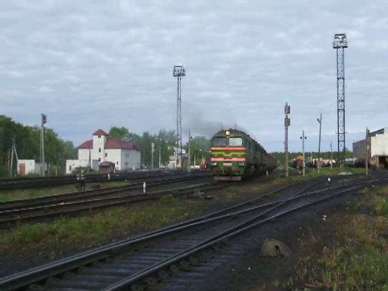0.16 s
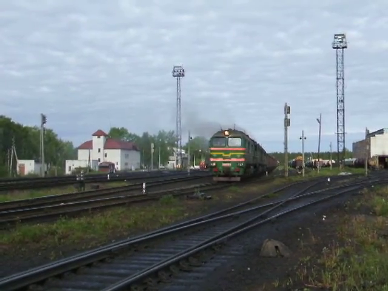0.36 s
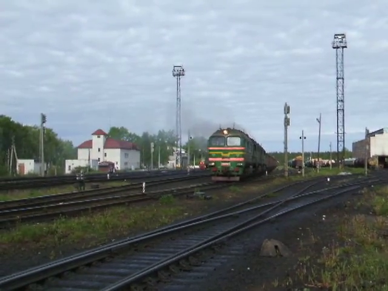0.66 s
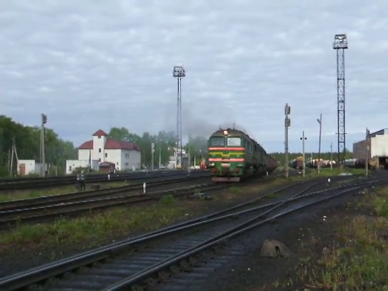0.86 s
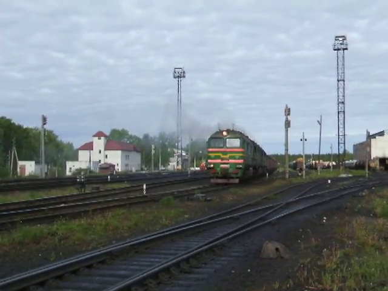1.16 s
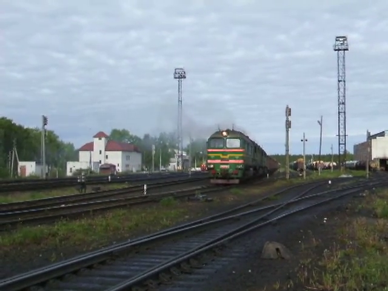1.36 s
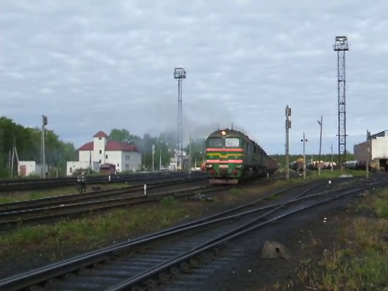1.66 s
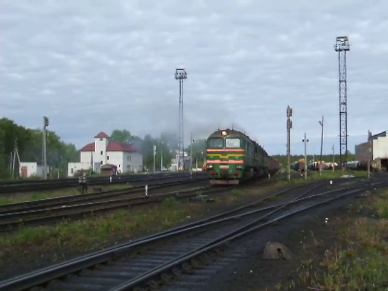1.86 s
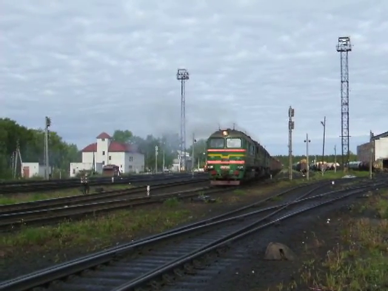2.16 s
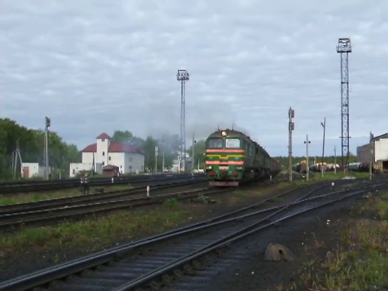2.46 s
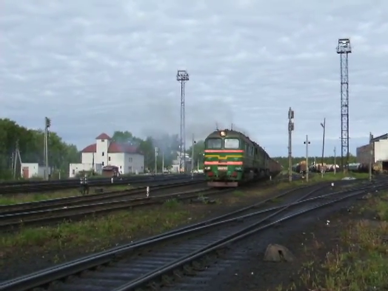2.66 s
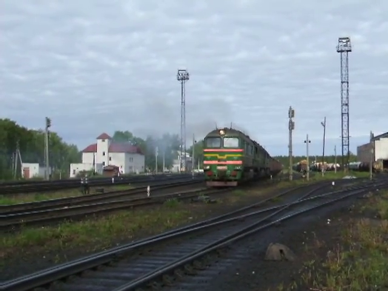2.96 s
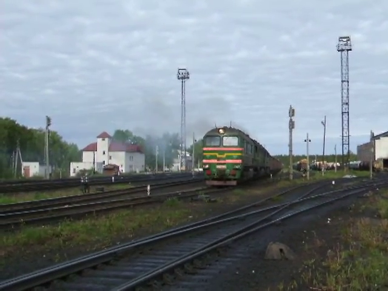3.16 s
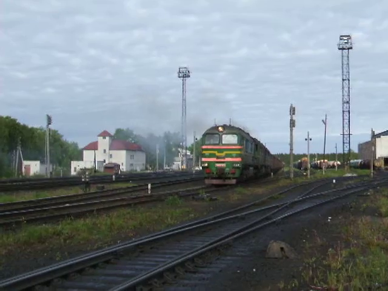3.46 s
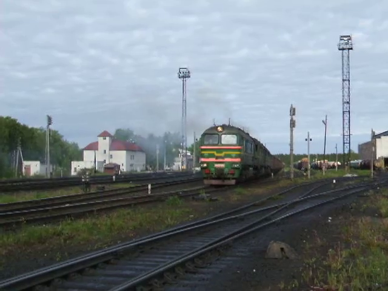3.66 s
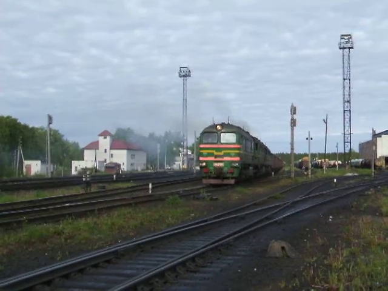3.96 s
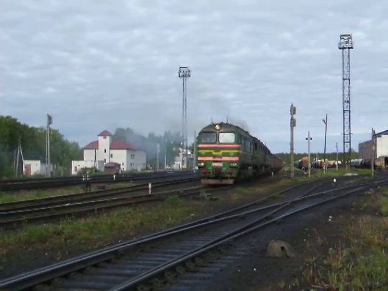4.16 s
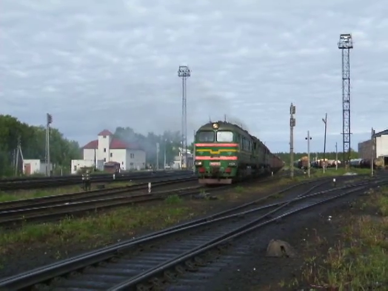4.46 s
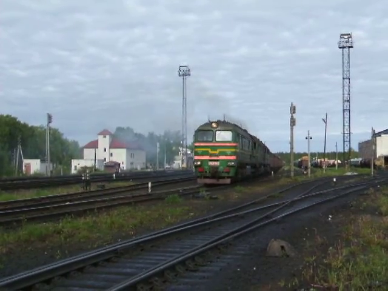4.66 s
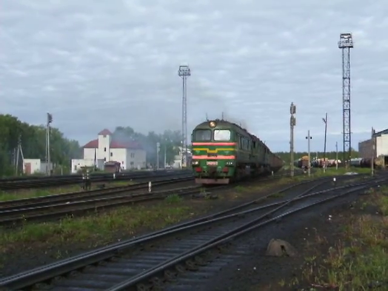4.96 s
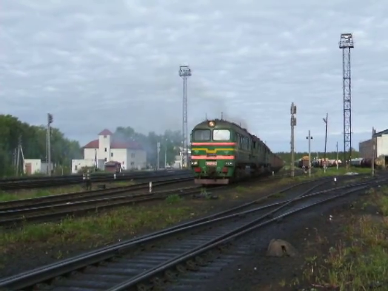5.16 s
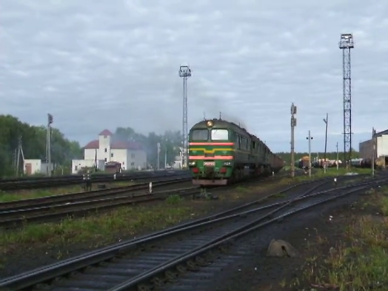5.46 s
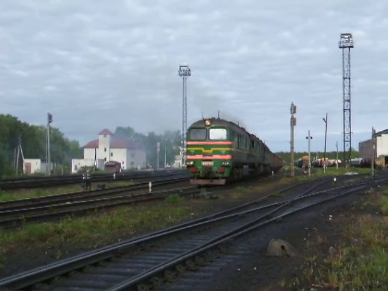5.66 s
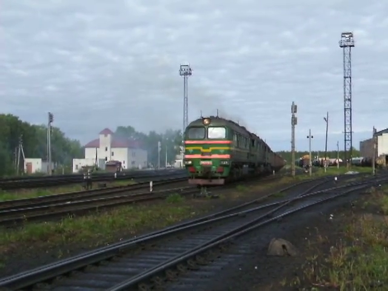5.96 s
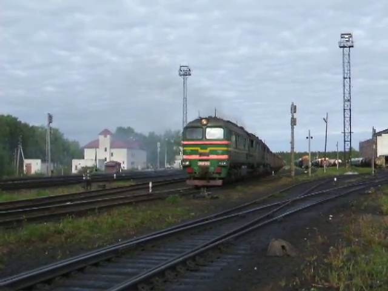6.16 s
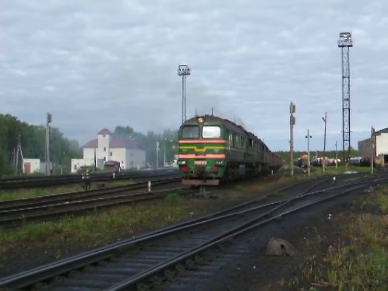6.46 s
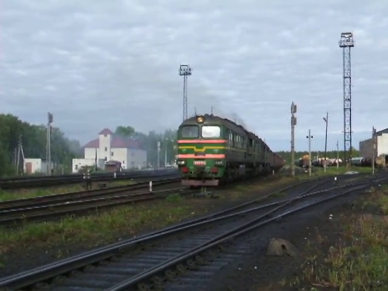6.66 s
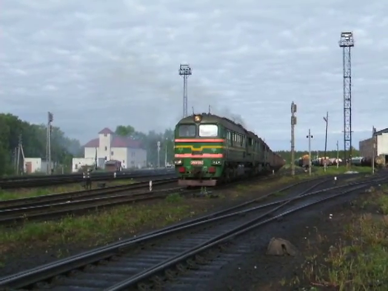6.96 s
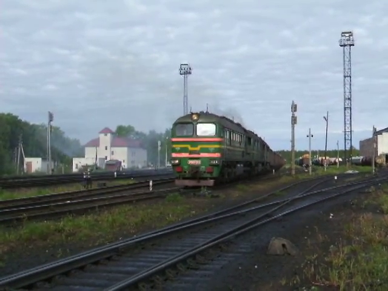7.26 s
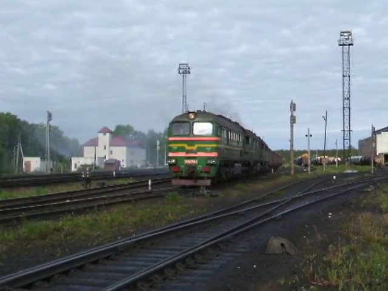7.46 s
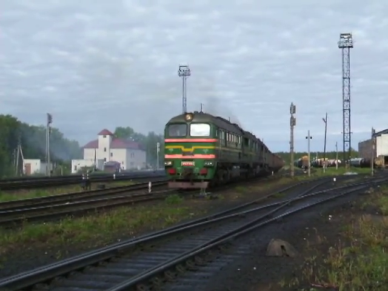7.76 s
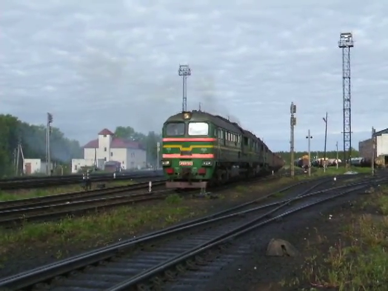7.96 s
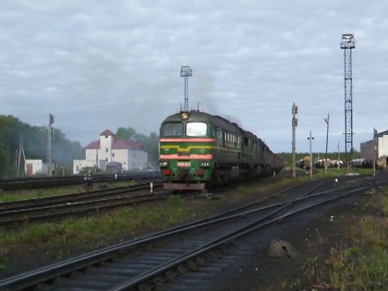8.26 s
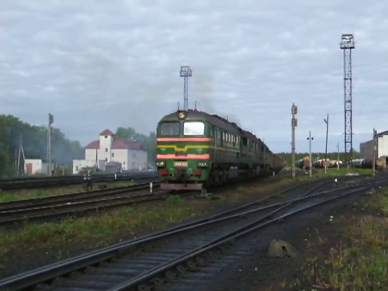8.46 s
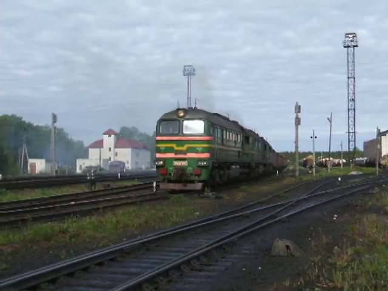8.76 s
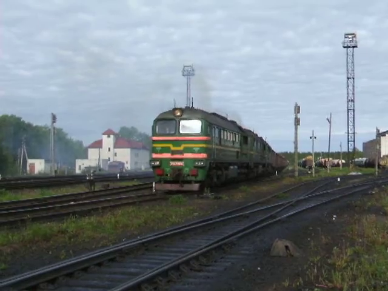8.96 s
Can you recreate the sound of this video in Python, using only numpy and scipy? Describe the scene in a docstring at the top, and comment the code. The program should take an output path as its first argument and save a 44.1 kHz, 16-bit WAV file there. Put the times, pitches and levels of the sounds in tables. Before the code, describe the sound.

Outdoors in a station yard, a slow freight locomotive gives a deep, unevenly pulsing diesel drone with steady roar and hiss throughout. The small hand-held microphone picks up a few handling ticks, then a short run of wind buffets along with a thin wheel squeal. After that, sharp plastic clicks sound up close and a distant bird chirps faintly. The engine grows slightly fuller toward the end.

```python
"""A station yard: a two-unit diesel locomotive creeps closer with a freight train.
Both engines hunt around 410 rpm; their exhaust tones beat under stack roar, machinery hiss and whines.
A wheel rings, a flange squeals once, a small bird chirps far off.
Wind buffets a small hand-held camera, whose plastic case ticks and rustles under the fingers."""
import sys
import numpy as np
from scipy import signal
from scipy.fft import rfft, irfft
from scipy.io import wavfile

SR = 44100
rng = np.random.default_rng(int(sys.argv[2]) if len(sys.argv) > 2 else 0)


def put_to_file(sound):
    """Save the sound as 16-bit audio at rate SR, in the file named by the first command-line argument."""
    columns = np.atleast_2d(sound).T  # one column per channel
    safe = np.clip(columns, -1, 1)
    whole_steps = np.round(safe * 32767)
    wavfile.write(sys.argv[1], SR, whole_steps.astype(np.int16))


N = 402191
T = np.arange(N) / SR
SHAFT_HZ = 6.803  # mean crankshaft speed

# beat minima of a six-cylinder bank's firing note: time_s, cancelled_share
FIRING_BEATS = [(-.3, 0.5), (.39, 0.6), (.68, .8), (1.43, 0.6), (1.8, .85), (2.41, .8), (2.98, 0.9),
                (3.55, 1), (3.92, .35), (4.84, .8), (5.82, 0.2), (6.8, .55), (7.58, 0.6), (8.52, .45),
                (9.3, .3)]
# firing note strength: time_s, gain_db
FIRING_GAIN = [(0, -32), (.5, -40), (1.05, -27), (1.65, -38), (2.1, -28), (2.7, -35), (3.3, -28.5),
               (4.15, -27), (4.85, -31.5), (5.5, -23), (7.8, -28), (9.12, -23)]
# beat minima of the deep drone: time_s, cancelled_share
DEEP_BEATS = [(-.15, 0.07), (.91, 0.2), (1.5, 0.4), (1.79, 0.55), (2.15, .3), (2.57, 0.7), (2.84, 0.6),
              (3.1, 0.3), (3.55, 0.66), (3.92, 0.3), (4.44, 0.1), (4.88, 1), (5.78, 0.5), (6.11, 0.54),
              (6.6, 0.37), (7.08, 0.6), (7.44, 0.7), (8.78, .75), (9.2, 0)]
# deep drone strength: time_s, gain_db
DEEP_GAIN = [(0, -22), (1.2, -21.5), (1.6, -28.5), (2, -20), (2.95, -29), (3.4, -21.5), (5.3, -23.5),
             (6.2, -25), (8.2, -23), (9.12, -25)]
# weaker engine tones (exhaust harmonics; gear or blower hum at 26 per turn): cycles_per_turn, gain_db
ENGINE_ORDERS = [(3, -38), (4, -37), (7, -33.5), (8, -35), (10, -32.5), (11, -39.5), (12, -39.5), (13, -40),
                 (14, -40.5), (15, -32), (16, -41.5), (17, -44), (18, -43.5), (21, -52), (22, -53.5),
                 (26, -40), (32, -55), (39, -49)]
# fullness of the low exhaust tones: time_s, relative_db
EXHAUST_SWELL = [(0, -32), (.68, -33.5), (.9, -25), (1.38, -37.5), (1.7, -30.5), (2.5, -31.5), (2.75, -30),
                 (3.9, -29), (4.3, -27), (4.55, -32.5), (6.2, -29.5), (8.75, -27.5), (8.92, -39),
                 (9.12, -26.5)]
# broad train noise: time_s, roar_gain_db, hiss_gain_db
NOISE_GAIN = [(0, -38.5, -43), (.9, -37.5, -42), (1.6, -38.5, -40), (2.15, -37, -41), (2.9, -39.5, -42.5),
              (3.33, -35.5, -39.5), (3.9, -40.5, -45.5), (4.6, -38, -42), (5.5, -38.5, -41),
              (6.1, -37, -41), (7.1, -36.3, -40), (7.45, -38.5, -41), (8.05, -35.5, -39.5),
              (8.6, -38.5, -42.5), (8.85, -37.5, -42.5), (9.12, -35, -39)]
# exhaust roar spectrum: freq_hz, gain_db
ROAR_SPECTRUM = [(20, -1.5), (48, 0.5), (75, 15), (140, 5.5), (200, 1.5), (270, 2), (310, 0.5), (380, 3),
                 (485, -11.5), (580, -1), (690, 1), (770, 1.5), (860, -10.5), (1500, -13.5)]
# machinery and wheel hiss spectrum: freq_hz, gain_db
HISS_SPECTRUM = [(300, -6), (850, 4), (1030, -0.5), (1160, 4.5), (1260, 1.5), (1370, 4), (1850, -3.5),
                 (2200, -2), (3400, -5.5), (4100, -8), (5200, -12.5), (6200, -11.5), (7600, -14),
                 (8900, -31.5)]
# brief dips in the hiss: centre_s, depth_db, width_s
HISS_DIPS = [(8.473, 3.5, .04), (8.68, 2.5, .06)]
# swells of a ringing wheel mode: centre_s, level_db, width_s
WHEEL_RINGS = [(2.15, -53.5, .5), (4.2, -58.5, 1.3), (6.0, -52, 0.58), (8.1, -52, 0.54)]
# gusts on the microphone: centre_s, level_db, width_s
WIND_GUSTS = [(3.236, -25.5, 0.033), (3.523, -19.5, .012), (3.541, -16.5, 0.014), (3.623, -16, 0.021),
              (3.652, -24, 0.02), (3.755, -24, 0.045), (3.825, -20, 0.033), (3.871, -16, 0.016),
              (4.172, -22.5, 0.028), (4.41, -30, 0.036), (4.65, -25.5, 0.024)]
# wind buffet spectrum: freq_hz, gain_db
WIND_SPECTRUM = [(20, -10), (70, 3.5), (170, 3.5), (300, -6.5), (500, -14.5), (900, -36), (3000, -57)]
# plastic case resonances: freq_hz, bandwidth_hz, gain_db
CASE_MODES = [(1300, 890, 11), (2230, 1400, 4), (3440, 280, 10.5), (5520, 490, -2.5), (6400, 450, 4.5),
              (7260, 500, -27)]
# slips on the case: start_s, peak_db, brightness_hz, bandwidth_hz, contact_s
CASE_SLIPS = [(1.259, -18.5, 6550, 2000, 0.005), (1.316, -22.5, 6550, 4000, .004),
              (1.3655, -22.5, 5200, 7000, .0024), (1.445, -18, 6440, 2500, 0.0032),
              (1.502, -22, 6500, 4000, .003), (1.552, -22, 4000, 6000, .002),
              (1.624, -21.5, 6000, 4000, .0034), (6.268, -21, 3740, 1800, 0.0029),
              (6.271, -15.5, 2200, 3180, 0.0016), (6.6685, -15, 3600, 12000, 0.0082),
              (6.67, -17, 7440, 1800, .003), (6.6917, -12.5, 6300, 5000, 0.002),
              (6.6972, -19, 6800, 6000, .003), (6.7054, -12.5, 1260, 1400, 0.00071),
              (6.7061, -13, 2580, 4500, 0.0007), (6.7086, -21, 4500, 14000, 0.0082),
              (6.847, -24, 6650, 5000, .0016), (7.3275, -24, 6000, 6000, .002),
              (7.3555, -24, 7000, 4000, .003), (8.079, -30, 7000, 5000, 0.0022),
              (8.522, -28.5, 7200, 6000, .0036)]
# fingers sliding on the case: centre_s, level_db, width_s
FINGER_RUBS = [(1.38, -42, .11), (1.55, -43, 0.14), (6.115, -44, .07), (6.72, -37.5, .055),
               (7.362, -34.5, .04), (8.05, -48.5, 0.18), (8.92, -50, 0.27)]
# finger rustle spectrum: freq_hz, gain_db
RUB_SPECTRUM = [(1000, -16), (4000, -9), (5500, -2.5), (6700, 1), (7900, 0), (9000, -23.5)]
# thin camera whines: pitch_hz, level_db
CAMERA_TONES = [(7678, -65), (7707, -72), (8293, -77), (8322, -69.5)]
# distant bird chirps: centre_s, level_db, top_pitch_hz, width_s
BIRD_CHIRPS = [(6.537, -45, 4300, .04), (6.755, -45, 4540, .035), (6.915, -44, 4250, 0.02),
               (6.96, -44, 4470, .03)]


def governor(swing_hz, period_s, peak_s):
    """Shaft speed in Hz: the governor overshoots and undershoots evenly."""
    return SHAFT_HZ + swing_hz * np.cos(2 * np.pi * (T - peak_s) / period_s)


def crank(speed_hz, wobble):
    """Turns made by a slightly uneven crankshaft."""
    return np.cumsum(speed_hz * (1 + wobble * walk(8.9))) / SR


def beating(turns, beats, order):
    """One exhaust tone from both units; the rear slips a cycle between beat minima."""
    minima_s, share = np.transpose(beats)
    slip = np.interp(T, minima_s, np.arange(len(minima_s)))
    phase = order * turns + rng.random()
    rear_share = np.interp(T, minima_s, share)
    return np.sqrt(2) * (np.sin(2 * np.pi * phase) - rear_share * np.sin(2 * np.pi * (phase + slip)))


def drone(turns, firing_db, deep_db):
    """The two strongest exhaust tones, throbbing as the units beat."""
    firing = undb(curve(FIRING_GAIN)[0] + firing_db) * beating(turns, FIRING_BEATS, order=6)
    deep = undb(curve(DEEP_GAIN)[0] + deep_db) * beating(turns, DEEP_BEATS, order=9)
    return firing + deep


def engine_tones(turns, gain_db, waver_db, swell_below_hz=140):
    """Exhaust harmonics of unequal cylinders plus a gear or blower hum; all waver, low ones swell."""
    swell_db, = curve(EXHAUST_SWELL)
    swell_db -= swell_db.mean()
    waver, out = walk(1.2), 0
    for order, db in ENGINE_ORDERS:
        low_share = 1 / (1 + (order * SHAFT_HZ / swell_below_hz) ** 8)
        drift_db = waver_db * np.roll(waver, rng.integers(N))
        out += undb(db + gain_db + low_share * swell_db + drift_db) * tone(turns, order)
    return out


def exhaust_roar(turns, level_db, chuff, lope, flutter_db):
    """Gas leaves the stack in puffs, stronger once a turn, and roars in the silencer."""
    puffs = 1 + chuff * (tone(turns, 12) + tone(turns, 9)) + lope * tone(turns, 1)
    gain = undb(level_db + flutter_db * walk(17))
    return gain * colour(puffs * rng.standard_normal(N), ROAR_SPECTRUM)


def machinery(turns, level_db, clatter, flutter_db):
    """Fans, valve gear and wheels hiss, with light clatter at the firing rate."""
    pulses = 1 + clatter * tone(turns, 12)
    dip_db = sum(db * np.exp(-((T - centre_s) / width_s) ** 2) for centre_s, db, width_s in HISS_DIPS)
    gain = undb(level_db - dip_db + flutter_db * walk(17))
    return gain * colour(pulses * rng.standard_normal(N), HISS_SPECTRUM)


def whine(ramp_hz, ramp_db, spread_hz):
    """Rough drive or blower whine, rising as the train gathers speed."""
    phase = 2 * np.pi * np.cumsum(np.linspace(*ramp_hz, N)) / SR
    narrow_noise = walk(spread_hz) * np.sin(phase) + walk(spread_hz) * np.cos(phase)
    return undb(np.linspace(*ramp_db, N)) * narrow_noise


def wheel_ring(mode_hz, bandwidth_hz):
    """Rolling rings a wheel mode faintly, on and off."""
    f = np.fft.rfftfreq(N, 1 / SR) + 1
    ring = irfft(rfft(rng.standard_normal(N)) * resonance(f, mode_hz, bandwidth_hz) ** 2, N)
    return swells(WHEEL_RINGS) * unit(ring)


def flange_squeal(peak_s, attack_s, release_s, pitch_hz, level_db, waver_db=3.5, waver_hz=14):
    """A flange sings briefly and unevenly on the rail."""
    width_s = np.where(T < peak_s, attack_s, release_s)
    grip = np.exp(-np.minimum(((T - peak_s) / width_s) ** 2, 20))
    return undb(level_db + waver_db * walk(30)) * grip * sine(pitch_hz + waver_hz * walk(40))


def wind():
    """Gusts thump on the microphone."""
    return swells(WIND_GUSTS) * colour(rng.standard_normal(N), WIND_SPECTRUM)


def case_ticks(size=4096):
    """Short slips excite the case; brighter contacts ring higher modes."""
    out, t, f = np.zeros(N + size), np.arange(size) / SR, np.fft.rfftfreq(size, 1 / SR) + 1
    body = sum(undb(db) * resonance(f, hz, bandwidth_hz) for hz, bandwidth_hz, db in CASE_MODES)
    for start_s, peak_db, brightness_hz, bandwidth_hz, contact_s in CASE_SLIPS:
        slip = rng.standard_normal(size) * np.exp(-t / contact_s)
        tick = irfft(rfft(slip) * body * resonance(f, brightness_hz, bandwidth_hz) ** 2)
        start = int(start_s * SR)
        out[start:start + size] += undb(peak_db) * tick / np.abs(tick).max()
    return out[:N]


def finger_rustle(grain_db):
    """Fingers slide on the plastic with grainy friction."""
    friction = rng.standard_normal(N) * undb(grain_db * walk(200))
    return swells(FINGER_RUBS) * colour(friction, RUB_SPECTRUM)


def bird(arch):
    """Each chirp rises to its top pitch and falls again."""
    out = 0
    for centre_s, db, top_hz, width_s in BIRD_CHIRPS:
        pitch_hz = top_hz * (1 - arch * np.minimum(((T - centre_s) / width_s) ** 2, 2))
        out += swells([(centre_s, db, width_s)]) * sine(pitch_hz)
    return out


def camera_whine(jitter_hz):
    """Thin, steady tones from the camera itself."""
    return sum(undb(db) * np.sqrt(2) * sine(hz + jitter_hz * walk(20)) for hz, db in CAMERA_TONES)


def undb(db):
    """Decibels to gain."""
    return 10 ** (np.asarray(db) / 20)


def unit(x):
    """Scale to rms 1."""
    return x / np.sqrt(np.mean(x ** 2))


def curve(table):
    """Each value column of a timed table, per sample."""
    time_s, *columns = np.transpose(table)
    return [np.interp(T, time_s, column) for column in columns]


def walk(cutoff_hz):
    """Smooth random drift, rms 1."""
    f = np.fft.rfftfreq(N, 1 / SR)
    return unit(irfft(rfft(rng.standard_normal(N)) / (1 + (f / cutoff_hz) ** 4), N))


def colour(x, spectrum):
    """Filter by (freq_hz, gain_db) points; rms 1."""
    hz, db = np.transpose(spectrum)
    f = np.fft.rfftfreq(N, 1 / SR) + 1e-3
    rolloff = 1 / (1 + (hz[0] / f / 2) ** 4) / (1 + (f / hz[-1] / 2) ** 4)
    gain = undb(np.interp(np.log(f), np.log(hz), db))
    return unit(irfft(rfft(x) * rolloff * gain, N))


def swells(table):
    """Sum of bell-shaped envelopes."""
    return sum(undb(db) * np.exp(-2 * np.minimum(((T - centre_s) / width_s) ** 2, 20))
               for centre_s, db, width_s in table)


def tone(turns, order):
    """Sine locked to the crankshaft, rms 1."""
    return np.sqrt(2) * np.sin(2 * np.pi * (order * turns + rng.random()))


def sine(pitch_hz):
    """Sine following a pitch curve, peak 1."""
    return np.sin(2 * np.pi * np.cumsum(pitch_hz) / SR)


def resonance(f, centre_hz, bandwidth_hz):
    """Damped resonance, gain 1 at its centre."""
    return 1 / (1 + 1j * centre_hz / bandwidth_hz * (f / centre_hz - centre_hz / f))


def scene():
    """Two engines, train noise, a bird and the sounds at the camera; mono."""
    lead = crank(governor(swing_hz=0.095, period_s=1.249, peak_s=1.06), wobble=0.00098)
    rear = crank(SHAFT_HZ * (1 + 0.01003 * walk(0.98)), wobble=0.0031)  # hunts out of step
    engines = drone(lead, firing_db=-1, deep_db=0.5)
    engines += engine_tones(lead, gain_db=-1, waver_db=1.9)
    engines += engine_tones(rear, gain_db=-7, waver_db=0.5)
    roar_db, hiss_db = curve(NOISE_GAIN)
    roar = exhaust_roar(lead, roar_db + 6, chuff=0.14, lope=0.045, flutter_db=0.8)
    hiss = machinery(lead, hiss_db + 3, clatter=0.036, flutter_db=0.8)
    drive = whine(ramp_hz=(1319, 1398), ramp_db=(-54, -52), spread_hz=15)
    drive += whine(ramp_hz=(734.6, 770.6), ramp_db=(-53, -46.5), spread_hz=16)
    blower = whine(ramp_hz=(678.6, 681.4), ramp_db=(-50.5, -49), spread_hz=13)
    wheels = wheel_ring(mode_hz=3656, bandwidth_hz=140)
    wheels += flange_squeal(peak_s=3.76, attack_s=0.07, release_s=0.11, pitch_hz=4676, level_db=-42.5)
    chirps = bird(arch=0.1)
    camera = wind() + finger_rustle(grain_db=3.4) + camera_whine(jitter_hz=3) + case_ticks()
    return (engines + roar + hiss + drive + blower + wheels + chirps + camera)[None]


def record(dry):
    """The camera rounds off the treble, then cuts it steeply."""
    rolloff_hz, cutoff_hz = 8300, 8900
    soft = signal.sosfilt(signal.butter(14, rolloff_hz, fs=SR, output="sos"), dry)
    return signal.sosfilt(signal.ellip(8, 0.3, 80, cutoff_hz, fs=SR, output="sos"), soft)


dry = scene()
out = record(dry)
put_to_file(out)
```